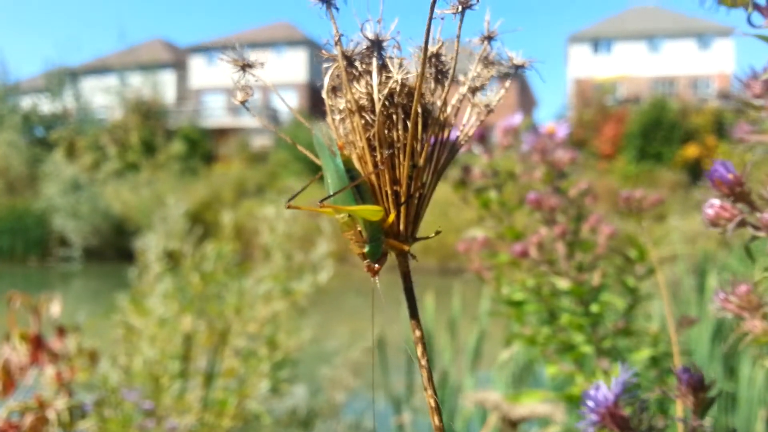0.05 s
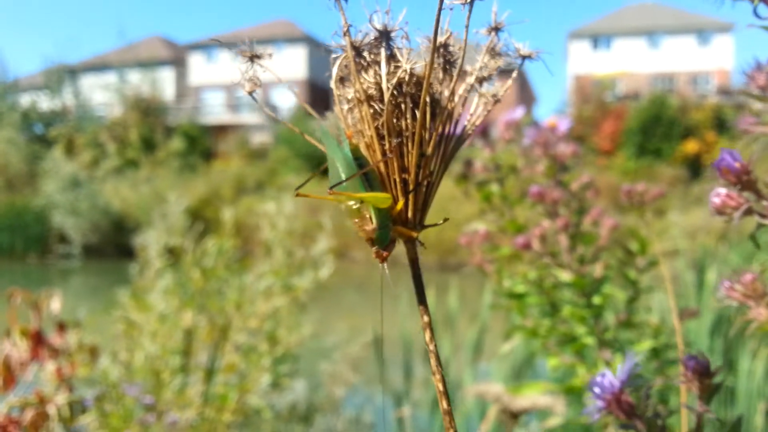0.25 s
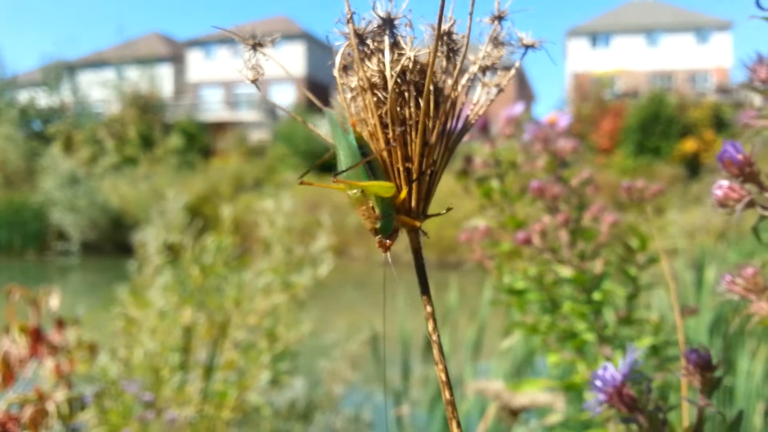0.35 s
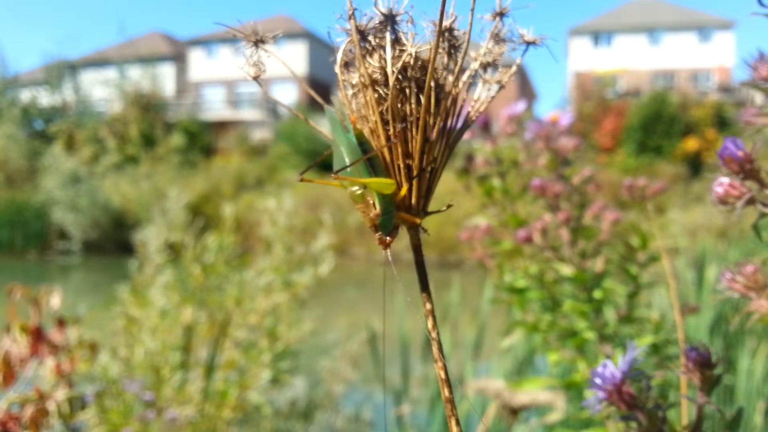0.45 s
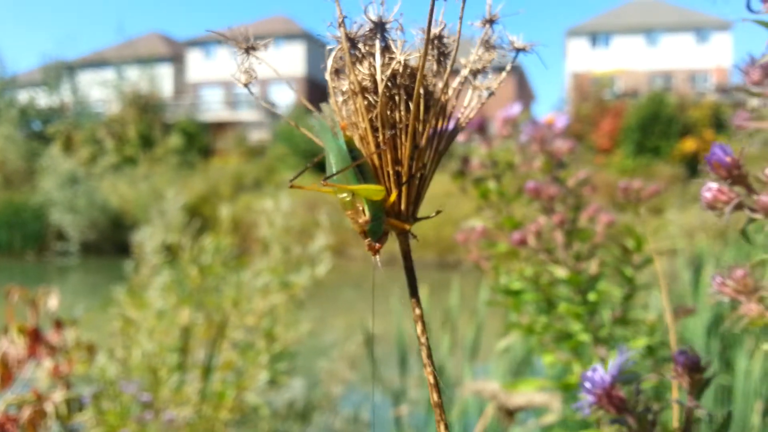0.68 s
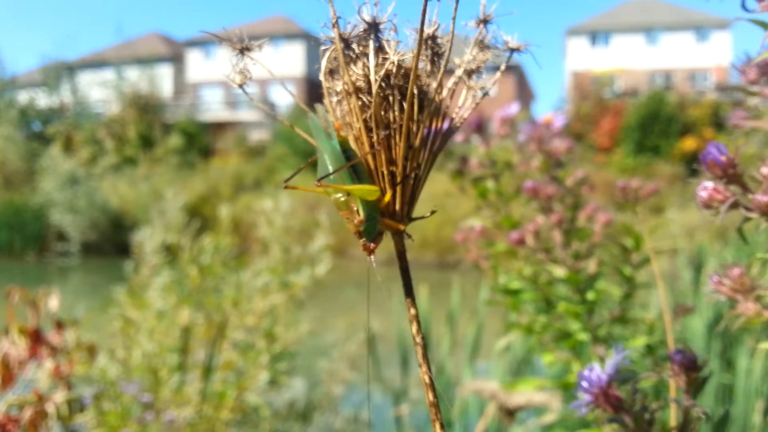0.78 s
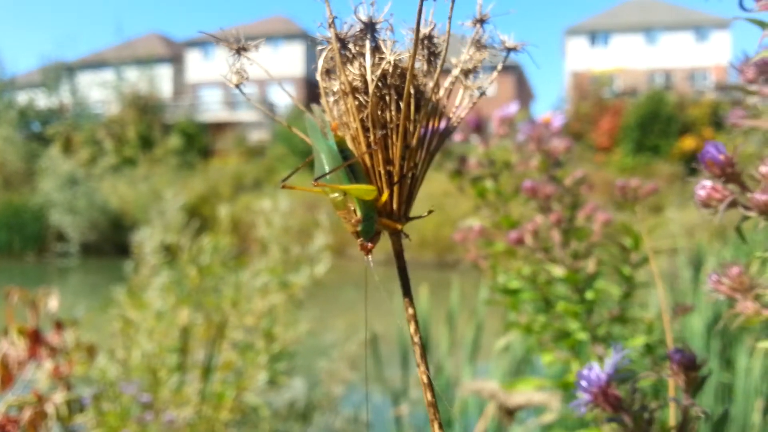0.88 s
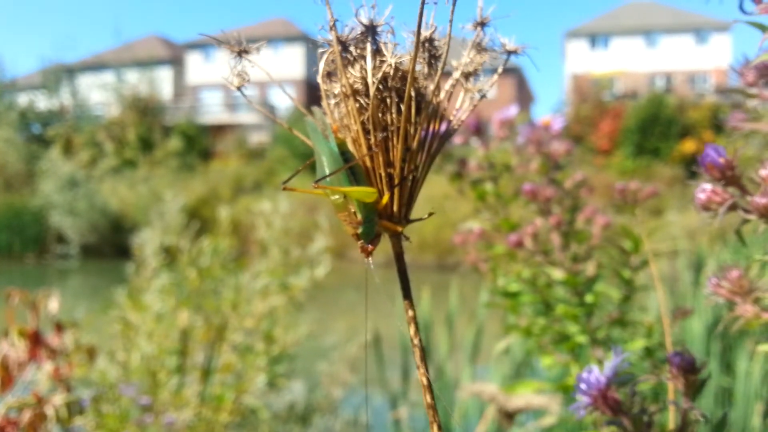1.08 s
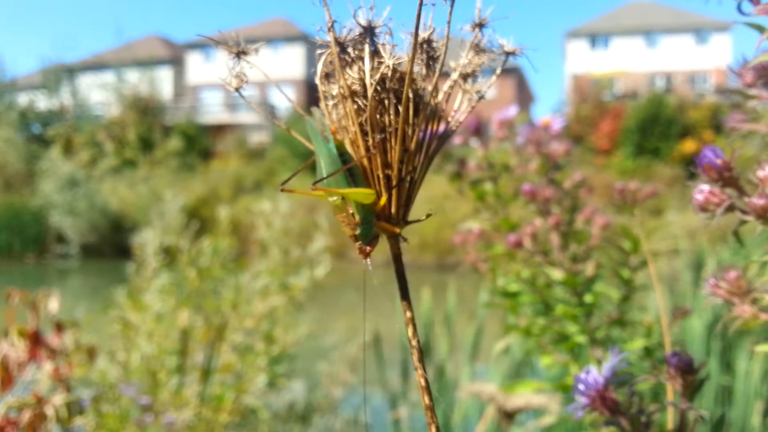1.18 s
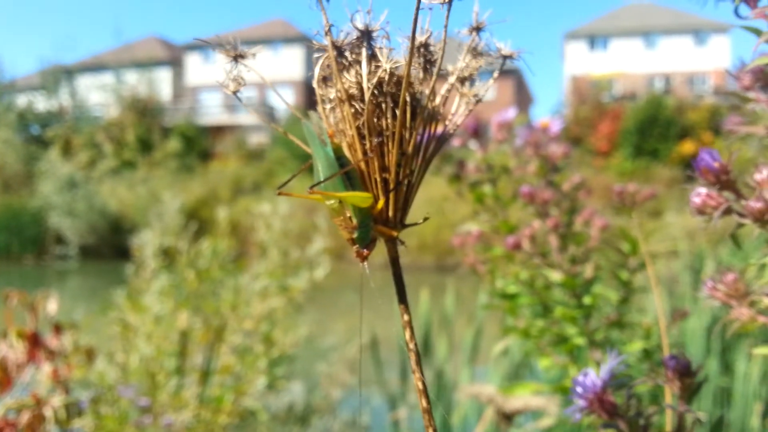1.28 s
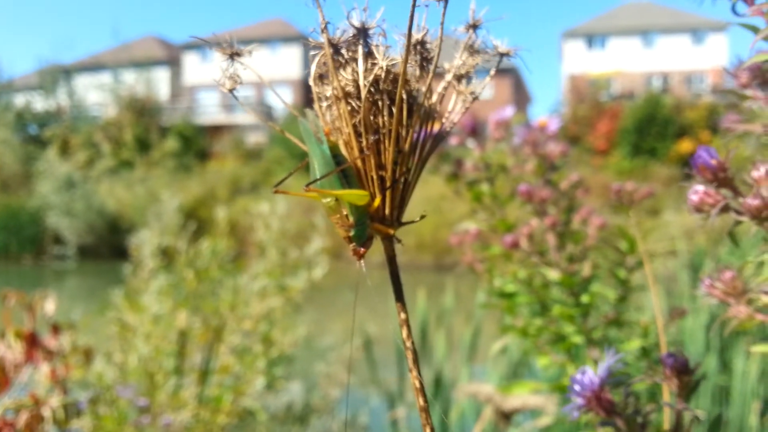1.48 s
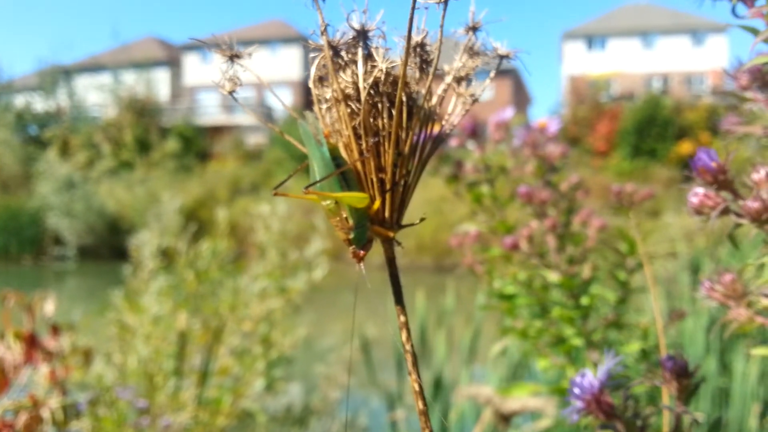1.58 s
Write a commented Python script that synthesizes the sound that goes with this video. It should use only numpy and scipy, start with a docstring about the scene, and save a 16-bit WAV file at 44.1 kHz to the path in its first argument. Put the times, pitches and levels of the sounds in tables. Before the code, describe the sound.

A close katydid ticks five times, then bursts into a fast, harsh, very high buzz that stops abruptly; quiet outdoor air, faint crickets and a far engine hum remain. Close stereo microphone, louder on the right, peaks distorting.

```python
"""Far engine hum, crickets and soft outdoor air open the scene over a faint steady low-mid band of noise.
From 0.2 s a near katydid, louder on the right, gives five hard ticks, each after a soft wing opening.
From 0.48 to 1.22 s it buzzes at about 60 strokes a second while the low background dips.
Every tooth of its wing file is a click that rings the wing, strongest at 10-15 kHz; loud peaks clip.
The background swells back, then a second, far katydid ticks three times and a thin whistle sounds."""
import sys
import numpy as np
from scipy import signal
from scipy.fft import rfft, irfft
from scipy.io import wavfile

SR = 44100
rng = np.random.default_rng(int(sys.argv[2]) if len(sys.argv) > 2 else 0)


def master(y):
    """Save y as 16-bit WAV."""
    cut = np.clip(np.atleast_2d(y).T, -1, 1)
    pcm = np.round(cut * 32767)  # scale
    wavfile.write(sys.argv[1], SR, pcm.astype(np.int16))


N = 72765
T = np.arange(N) / SR


def amp(db):
    """Decibels to gain."""
    return 10 ** (np.asarray(db) / 20)


def evened(x):
    """Scales to rms 1."""
    return x / np.sqrt(np.mean(x ** 2) + 1e-20)


def curve(points, t):
    """Reads a table over time."""
    return np.interp(t, *np.transpose(points))


def read(points, hz):
    """Reads a table over log frequency."""
    f, value = np.transpose(points)
    return np.interp(np.log(hz + 1), np.log(f + 1), value)


def band_noise(hz, width):
    """Noise of rms 1 in one bell-shaped band."""
    f = np.fft.rfftfreq(N, 1 / SR)
    band = 1 / (1 + .5 * ((f - hz) / width) ** 2) ** 2
    return evened(irfft(rfft(rng.standard_normal(N)) * band, N))


def puff(s, length, hz, width, db):
    """A band of noise that swells and fades around the moment s."""
    return amp(db) * np.exp(-.5 * ((T - s) / length) ** 2) * band_noise(hz, width)


# Closing wings' tone. Each row: frequency in Hz, relative level in dB.
CLOSING_RING = [(1500, -107), (3200, -73.5), (4400, -46.5), (5200, -36), (6000, -27), (8000, -16),
                (9200, -10.5), (10400, -1), (11400, -1), (12500, 3.5), (13500, 1.5), (14400, 0),
                (15200, -27), (17000, -37.5)]
# Opening wings' tone before ticks and buzz. Each row: frequency in Hz, relative level in dB.
OPENING_RING = [(1500, -68), (3500, -19), (4800, -5), (7000, -16), (8500, 6.5), (10000, -6.5),
                (14000, -4.5), (15500, -17)]
# Return strokes' tone in the buzz. Each row: frequency in Hz, relative level in dB.
RETURN_RING = [(1500, -92), (4700, -55), (6000, -8), (8200, 1), (11000, 6.5), (14000, -11), (15500, -50)]
# Pitch bend within a closing. Each row: share of the stroke from 0 to 1, pitch factor.
PITCH_GLIDE = [(0, 1.015), (.5, 1.034), (1, 0.95)]
# Wing speed in the buzz. Each row: time in seconds, strokes per second.
STROKE_RATE = [(0.48, 58.09), (0.52, 65.07), (0.56, 63.42), (0.62, 63.53), (0.68, 62.27), (0.76, 63.05),
               (0.83, 62.3), (0.91, 61.47), (0.98, 62.71), (1.05, 60.12), (1.12, 62.73), (1.22, 56.92)]
# Hard single closings. Each row: start in seconds, pause after the first catch in seconds,
# length in seconds, level in dB.
TICKS = [(0.234, 0.00067, 0.011, 3), (0.296, 0.0022, 0.0076, 3.5), (0.35, 0.0019, 0.0074, 2.5),
         (0.4103, 0.0014, 0.0076, 5.5), (0.4651, 0.00073, 0.0095, 2)]
# Soft wing openings before the ticks and the buzz. Each row: start in seconds, peak level in dB.
OPENINGS = [(0.205, -23.5), (0.27, -24), (0.325, -26), (0.383, -30), (0.4355, -19), (0.477, -26.5)]
FIRST_STROKE_TURNS = .57  # strokes to count off before the first one
RETURN_DB, RETURN_AFTER_S = -23.5, 0.0055  # light return stroke between closings of the buzz


def katydid(count=5):
    """Wings tick, then buzz; each closing's ring lifts slightly, then sinks in pitch."""
    running = (T >= STROKE_RATE[0][0]) & (T <= STROKE_RATE[-1][0])
    turns = np.cumsum(curve(STROKE_RATE, T) * running) / SR - FIRST_STROKE_TURNS
    centres = T[1:][np.diff(np.floor(turns)) > 0]
    teeth = np.hstack([tick(*row) for row in TICKS] + [stroke(s) for s in centres])

    # Sort the teeth into steps along the pitch glide
    part = np.clip(np.floor(teeth[2] * count), 0, count - 1)
    closing = 0
    for k in range(count):
        pitch = curve(PITCH_GLIDE, (k + .5) / count)
        closing = closing + ring(teeth[:, part == k], CLOSING_RING, pitch)

    openings = np.hstack([opening(*row) for row in OPENINGS])
    returns = np.hstack([opening(s + RETURN_AFTER_S, RETURN_DB) for s in centres[:-1]])
    return closing + ring(openings, OPENING_RING) + ring(returns, RETURN_RING)


TOOTH_SPREAD_DB = .9  # random tooth-to-tooth level, in ticks and strokes
TICK_TOOTH_S, TICK_JITTER = 0.00071, .2  # typical gap between teeth, and its log spread
TICK_FADE_DB = -5  # reached at the end of the tick


def tick(start, pause, length, db, count=40):
    """The scraper catches once, sticks, then skids unevenly across the file."""
    gaps, sizes = rng.standard_normal((2, count))
    skid = np.cumsum(TICK_TOOTH_S * np.exp(TICK_JITTER * gaps[1:-1]))
    t = np.r_[0, pause + np.r_[0, skid]]
    fade = TICK_FADE_DB * np.minimum(t / length, 1) ** 4
    gain = amp(db + TOOTH_SPREAD_DB * sizes + fade)
    return np.array([start + t, gain, t / length])[:, t < length]


# Effort in the buzz. Each row: time in seconds, level in dB.
EFFORT = [(.49, -8), (.507, -1.5), (.53, -3.5), (.64, -5), (.76, -4.5), (.93, -4), (1.02, -4.5), (1.11, -4),
          (1.215, -5)]
STROKE_S, STROKE_LEAD_S = .0108, .0065  # typical length, and head start before the centre
STROKE_RISE_S, STROKE_FALL_S = 0.0026, 0.0015
STROKE_SPREAD = 0.03376  # random spread of stroke length and of tooth speed
STROKE_SAG_DB = -0.5  # later teeth strike slightly softer
TOOTH_SLOW_S, TOOTH_FAST_S, TOOTH_JITTER = .00068, .00042, .14  # first gap, last gap, log spread
GLIDE_SPREAD = .25  # random shift along the pitch glide, as a share of the stroke


def stroke(centre, count=40):
    """One closing in the buzz: it swells, and the teeth come faster until the wings part."""
    gaps, sizes = rng.standard_normal((2, count))
    speed, stretch, sink = rng.standard_normal(3)
    length = STROKE_S * (1 + STROKE_SPREAD * stretch)
    t = np.zeros(count)
    for k in range(1, count):
        gap = np.interp(t[k - 1], [0, length], [TOOTH_SLOW_S, TOOTH_FAST_S])
        t[k] = t[k - 1] + gap * np.exp(TOOTH_JITTER * gaps[k] + STROKE_SPREAD * speed)
    shape = np.clip(t / STROKE_RISE_S, 0, 1) * np.clip((length - t) / STROKE_FALL_S, 0, 1)
    sag = STROKE_SAG_DB * (t / length - .5)
    gain = shape * amp(curve(EFFORT, centre) + sag + TOOTH_SPREAD_DB * sizes)
    start = centre - STROKE_LEAD_S * length / STROKE_S
    return np.array([start + t, gain, t / length + GLIDE_SPREAD * sink])


OPENING_S, OPENING_TOOTH_S = .0045, .00035  # length, and mean gap between teeth


def opening(start, db, count=40):
    """A light backward brush over the teeth that swells and fades."""
    t = np.cumsum(OPENING_TOOTH_S * rng.uniform(.5, 1.5, count))
    t = t[t < OPENING_S]
    return np.array([start + t, amp(db) * np.sin(np.pi * t / OPENING_S)])


WING_SMEAR_S, WING_CENTRE_HZ = .001, 12500  # tones above the centre leave late, those below early


def ring(teeth, spectrum, pitch=1, size=1024):
    """Each tooth strike (s, gain) rings the wing with a pulse whose envelope peaks at 1."""
    at, gain = teeth[:2]
    # Windowed sinc clicks land between samples, at the exact strike times
    near = np.round(at * SR).astype(int)[:, None] + np.arange(-12, 13)
    off = near - at[:, None] * SR
    click = np.sinc(off) * np.cos(off * np.pi / 26) ** 2
    clicks = np.zeros(N)
    np.add.at(clicks, np.clip(near, 0, N - 1), gain[:, None] * click)

    # Minimum-phase pulse, then the smear that delays high tones
    hz = np.fft.fftfreq(size, 1 / SR)
    log_gain = np.log(amp(read(spectrum, abs(hz) / pitch)))
    smear = 2 * np.pi * WING_SMEAR_S * hz * (abs(hz) - 2 * WING_CENTRE_HZ) / SR
    pulse = np.fft.ifft(np.exp(np.conj(signal.hilbert(log_gain)) - 1j * smear)).real
    peak = abs(signal.hilbert(pulse)).max()
    return signal.oaconvolve(clicks, np.fft.fftshift(pulse) / peak, "same")


# Faint rasps after two of the ticks. Each row: centre in seconds, length in seconds, level in dB.
RASPS = [(0.366, 0.009, -30), (0.423, 0.0089, -30)]


def rasps(hz=11000, width=5300):
    """Wide puffs of treble noise linger behind the ticks."""
    return sum(puff(s, length, hz, width, db) for s, length, db in RASPS)


# Hiss in the buzz. Each row: time in seconds, upper band level in dB, lower band level in dB.
HISS = [(.475, -55, -52), (.53, -43, -51.5), (.57, -41, -83), (.96, -43, -84), (0.994, -60, -50),
        (1.143, -43, -45.5), (1.17, -37, -81), (1.226, -48, -64)]


def hiss():
    """A smooth hiss runs on between strokes; a lower band comes and goes beneath it."""
    s, upper_db, lower_db = np.transpose(HISS)
    upper = amp(np.interp(T, s, upper_db, -120, -120)) * band_noise(8000, 850)
    lower = amp(np.interp(T, s, lower_db, -120, -120)) * band_noise(4900, 750)
    return upper + lower


# Faint cluster of tones at the third tick. Each row: frequency in Hz, starting level in dB.
RING_TONES = [(748, -34), (1023, -39.5), (2089, -36.5), (3068, -33.5), (3758, -31.5), (4673, -36)]
RING_AT_S, RING_T60_S = .352, 0.075


def lingering_ring():
    """A faint cluster of steady tones starts at the third tick and dies away."""
    t = np.maximum(T - RING_AT_S, 0)
    return sum(amp(db - 60 * t / RING_T60_S) * np.sin(2 * np.pi * hz * t) for hz, db in RING_TONES)


# Shading of the left microphone, which faces away. Each row: frequency in Hz, dB against the right.
LEFT_SHADE = [(3000, -17), (6500, -14), (8300, -8), (10500, -9), (12200, -9), (13400, -18), (14400, -10)]
# Colour of the tail. Each row: frequency in Hz, relative level in dB.
TAIL_COLOUR = [(3000, 10.5), (5500, 16.5), (8000, 3.5), (10000, 1), (12500, -0.5), (14500, -1.5)]
LEFT_LAG_S = .000188
TAIL_DB, TAIL_T60_S = -19, 0.071  # level before the colour, and decay time


def at_microphones(song):
    """The song reaches the left microphone late and shaded; a faint diffuse noisy tail follows it."""
    hz, t = np.fft.rfftfreq(N, 1 / SR), T[:SR // 4]
    left = amp(read(LEFT_SHADE, hz)) * np.exp(-2j * np.pi * hz * LEFT_LAG_S)
    ports = rfft(song) * np.array([left, np.ones(len(hz))])
    tail = rng.standard_normal((2, len(t))) * amp(-60 * t / TAIL_T60_S)
    tail = tail / np.linalg.norm(tail[0])
    coloured = irfft(ports * amp(TAIL_DB + read(TAIL_COLOUR, hz)), N)
    return irfft(ports, N) + signal.oaconvolve(coloured, tail, axes=1)[:, :N]


# Shared fader of air and engine, dipping under the buzz. Each row: time in seconds, level in dB.
BACKGROUND = [(0, -2.5), (.2, -1.5), (.48, -3.5), (.54, -12), (.61, -89), (.93, -27), (1.0, -7), (1.15, -8),
              (1.2, -14.5), (1.255, 4.5), (1.34, -1.5), (1.65, -2.5)]
# Engine orders. Each row: multiple of the base pitch, level in dB before the song, level in dB after it
# (both ride the fader), level in dB of the part that never dips; side gains come on top.
ENGINE = [(1, -57.5, -68, -100), (2, -64, -63, -95), (3, -58, -53.5, -100), (4, -65, -60.5, -104),
          (5, -73.5, -91.5, -69.5), (6, -80, -66, -77.5)]
ENGINE_HZ, ENGINE_WAVER = 81, 0.00818  # base pitch, and rms speed waver as a share


def engine(left_db=-5.0, right_db=1):
    """A far engine hums in harmonics at a nearly steady speed while its colour drifts."""
    turns = np.cumsum(ENGINE_HZ * (1 + ENGINE_WAVER * band_noise(0, 8.9))) / SR
    hum = 0
    for k, early, late, least in ENGINE:
        drift = np.interp(T, [.2, 1.3], [early, late])
        level = amp(drift + curve(BACKGROUND, T)) + amp(least)
        hum = hum + level * np.sin(2 * np.pi * (round(k) * turns + rng.random()))
    return np.sqrt(2) * hum * amp([[left_db], [right_db]])


# Far cricket trills. Each row: frequency in Hz, width in Hz, level in dB before the side gains.
CRICKETS = [(5360, 27, -77.5), (5675, 7.55, -63.5), (6200, 38, -90.5), (6110, 28.7, -94), (6600, 20, -73.5),
            (7425, 40, -77.5)]


def crickets(left_db=-1, right_db=2):
    """Far trills blur into narrow steady bands of noise."""
    sides = []
    for side in (left_db, right_db):
        sides.append(sum(amp(db + side) * band_noise(hz, width) for hz, width, db in CRICKETS))
    return np.array(sides)


# Thin far whistle. Each row: start in seconds, length in seconds, frequency in Hz, level in dB.
WHISTLES = [(1.586, .08, 2790, -64.5)]


def whistles(edge_s=0.0043):
    """Faint far sine notes with short ramps at both ends."""
    notes = 0
    for s, length, hz, db in WHISTLES:
        fade = np.clip(np.minimum(T - s, s + length - T) / edge_s, 0, 1)
        notes = notes + amp(db) * fade * np.sin(2 * np.pi * hz * T)
    return np.sqrt(2) * notes


# Soft short bumps of noise, low to middle, from 0.4 s on. Each row: centre in seconds,
# length in seconds, frequency in Hz, width in Hz, level in dB.
BUMPS = [(0.417, 0.011, 100, 131, -46), (0.557, 0.0094, 334.4, 253, -45.5), (0.658, .016, 81, 44.3, -68),
         (0.752, 0.021, 178, 39.2, -69.5), (0.913, 0.02, 130, 53.2, -63), (0.976, 0.017, 560, 194, -59),
         (1.138, 0.008, 1210, 920, -45), (1.156, .008, 2650, 280, -52)]
# Ticks of a second, far katydid. Each row: centre in seconds, level in dB.
FAR_TICKS = [(1.496, -54), (1.551, -59), (1.618, -55)]
FAR_TICK_S, FAR_TICK_HZ, FAR_TICK_WIDTH_HZ = 0.0049, 13000, 630
LOW_MID_HZ, LOW_MID_WIDTH_HZ, LOW_MID_DB = 490.5, 51, -70


def surroundings():
    """A faint steady low-mid band of noise, soft bumps and a second katydid, for one microphone."""
    low_mid = amp(LOW_MID_DB) * band_noise(LOW_MID_HZ, LOW_MID_WIDTH_HZ)
    bumps = sum(puff(*row) for row in BUMPS)
    far_ticks = sum(puff(s, FAR_TICK_S, FAR_TICK_HZ, FAR_TICK_WIDTH_HZ, db) for s, db in FAR_TICKS)
    return low_mid + bumps + far_ticks


# Colour of the outdoor air. Each row: frequency in Hz, relative level in dB per Hz.
AIR = [(18, -86), (30, -45), (74, -8.5), (165, -8), (193, -7.5), (244, -3.5), (277, -3.5), (324, -3.5),
       (1240, -16.5), (5430, -22.5), (5870, -20.5), (14500, -24)]
# Stereo likeness of the air. Each row: frequency in Hz, left-right likeness from 0 to 1.
AIR_SAME = [(60, 1), (300, 0.019), (700, 0.54), (1400, 0), (15000, 0)]
# Treble fader of the air, on top of the shared one. Each row: time in seconds, level in dB.
AIR_TREBLE = [(.47, 0.5), (.52, -19), (1.2, -9), (1.24, 1)]
AIR_DB, AIR_SPLIT_HZ = -50.5, 1350  # level before the faders, and bass-treble split


def air():
    """Soft coloured noise, the same on both sides in the deep bass; its treble has a fader of its own."""
    hz = np.fft.rfftfreq(N, 1 / SR)
    a, b = rfft(rng.standard_normal((2, N)))
    same = np.clip(read(AIR_SAME, hz), -1, 1)
    pair = np.array([a, same * a + np.sqrt(1 - same ** 2) * b])
    noise = amp(AIR_DB) * evened(irfft(pair * amp(read(AIR, hz)), N))
    bass = irfft(rfft(noise) / (1 + (hz / AIR_SPLIT_HZ) ** 4), N)
    treble = (noise - bass) * amp(curve(AIR_TREBLE, T))
    return (bass + treble) * amp(curve(BACKGROUND, T))


def scene():
    """The near singer over the far background."""
    song = katydid() + rasps() + hiss() + lingering_ring()
    # Each microphone gets its own draw of the surroundings
    far = engine() + crickets() + whistles() + np.array([surroundings(), surroundings()]) + air()
    return at_microphones(song) + far


CLIP_TOP, CLIP_BOTTOM = 1.072, -0.871  # the overload is lopsided
EDGE_HZ = 14950


def record(dry):
    """The loudest peaks clip hard; then a steep low-pass limits the band."""
    clipped = np.clip(dry, CLIP_BOTTOM, CLIP_TOP)
    low_pass = signal.firwin(201, EDGE_HZ, window=("kaiser", 7), fs=SR)
    return signal.oaconvolve(clipped, low_pass[None], "same")


dry = scene()
out = record(dry)
master(out)
```